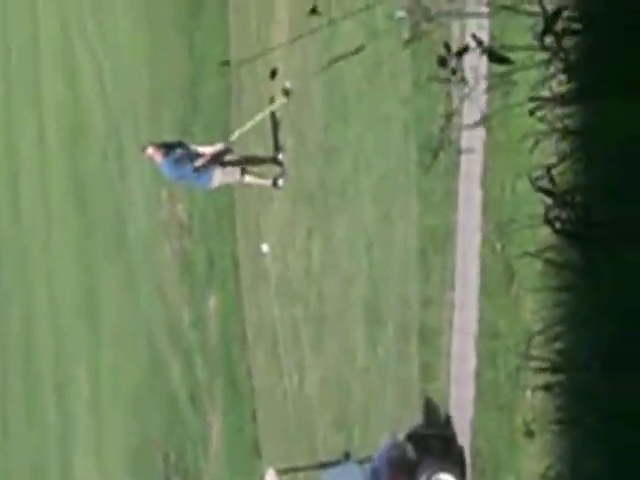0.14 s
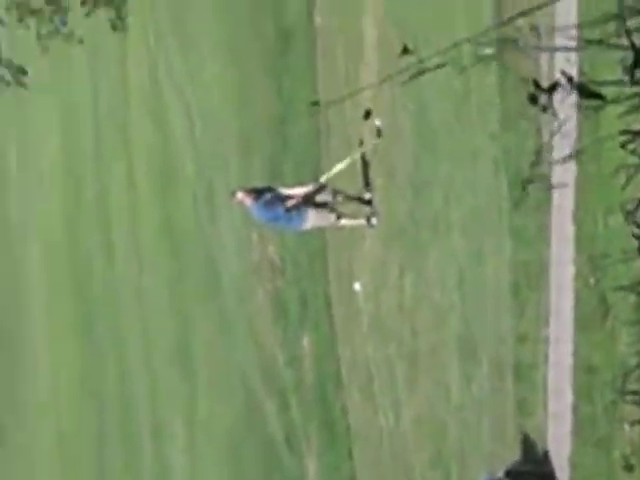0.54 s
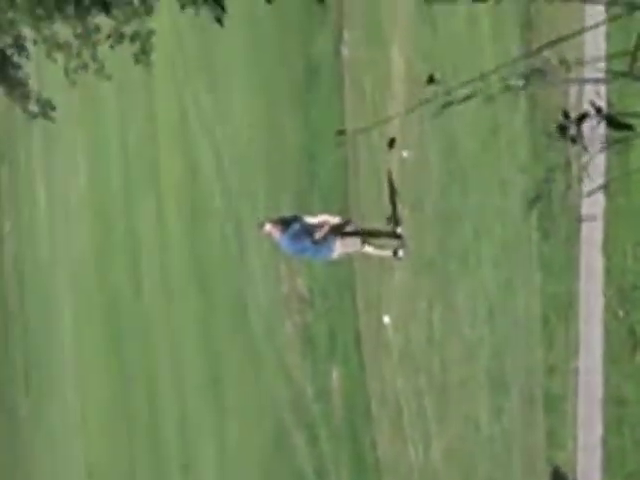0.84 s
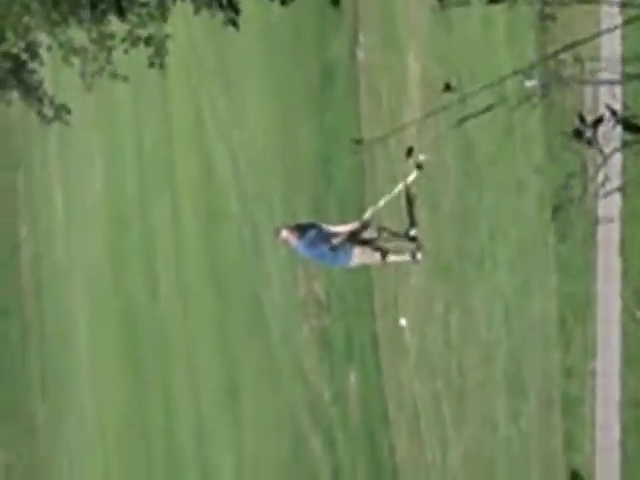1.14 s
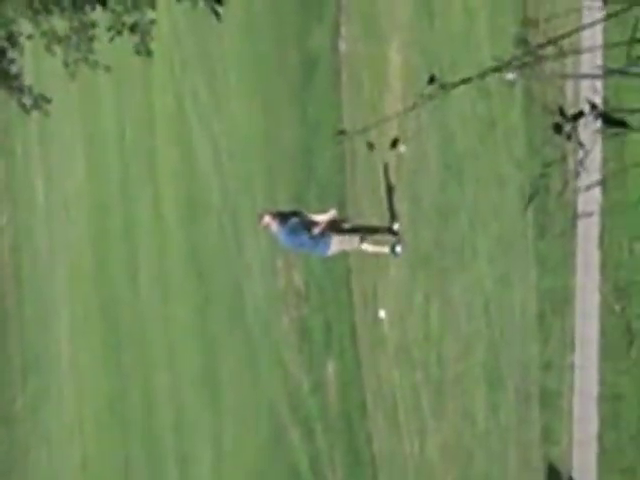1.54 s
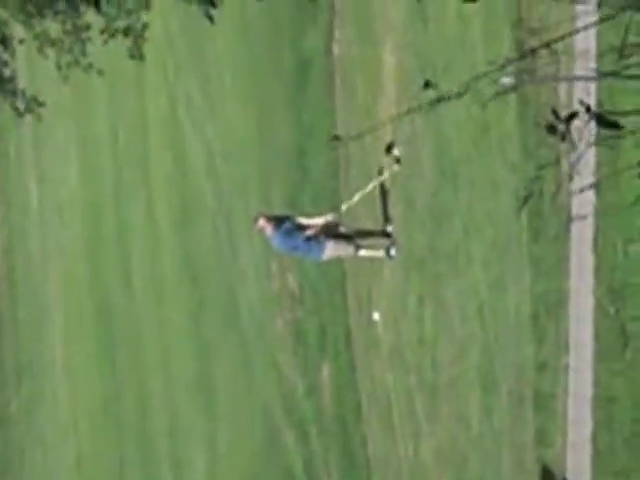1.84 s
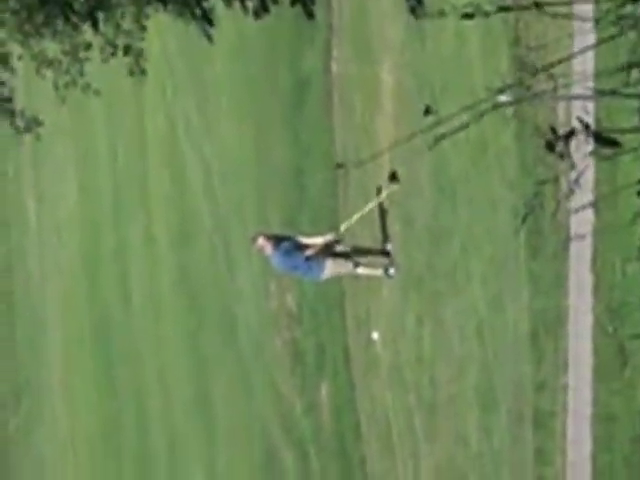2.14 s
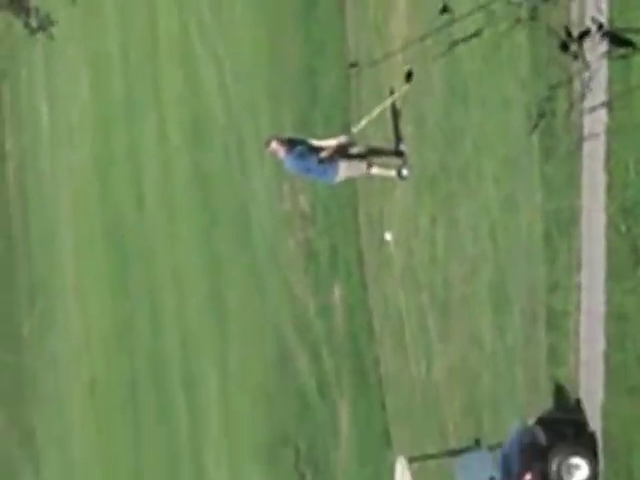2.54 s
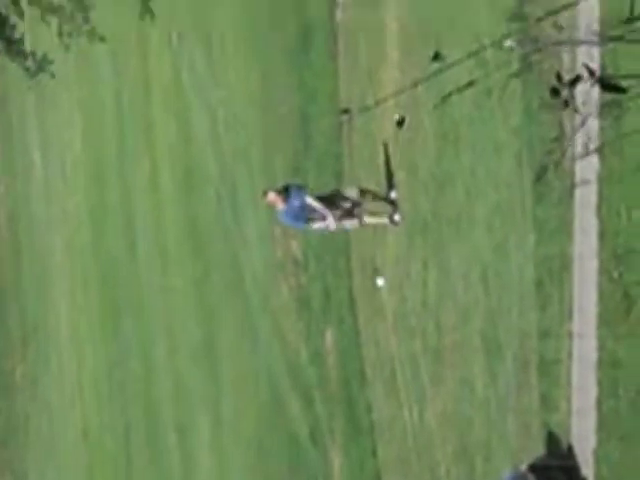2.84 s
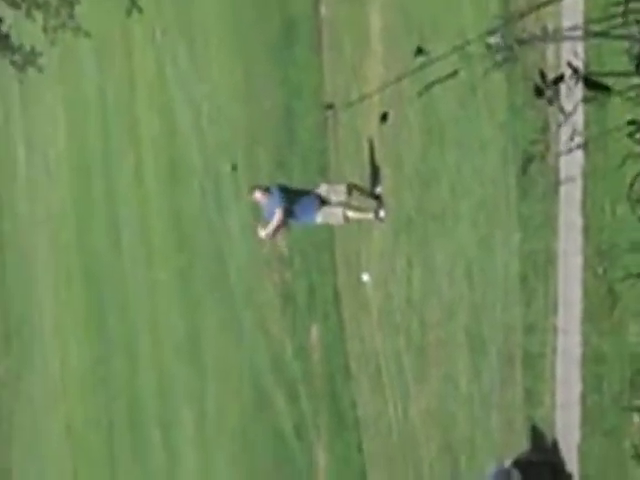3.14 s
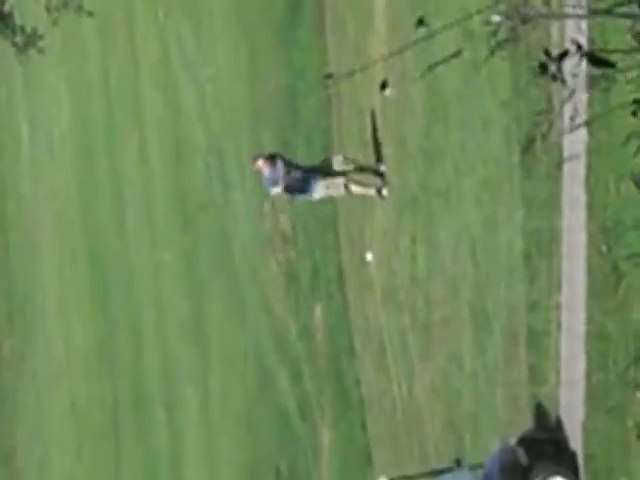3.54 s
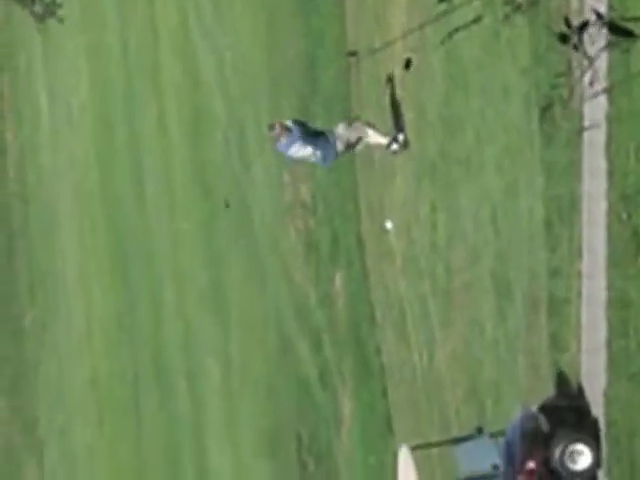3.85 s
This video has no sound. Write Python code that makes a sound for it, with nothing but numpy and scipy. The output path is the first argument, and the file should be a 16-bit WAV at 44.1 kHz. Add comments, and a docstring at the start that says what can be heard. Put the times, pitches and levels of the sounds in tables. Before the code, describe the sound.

One abrupt, brassy air horn honk with gas hiss ends a quiet outdoor stretch of whistling birds, low rumble and insects; it stops quickly, leaving a tree-line echo while the microphone's level ducks.

```python
"""Far traffic, low rumble, an idling engine, insects, hiss and a thin whine underlie the scene: shaped noise and sines.
Distant birds whistle and chirp over them: gliding sines with a diffuse return.
At 3.54 s a handheld air horn on open grass gives one short blast: a harmonic series and gas hiss.
Tree lines throw it back: delayed copies and a decaying noise tail.
A mono gain control ducks under the blast and recovers slowly."""
import sys
import numpy as np
from scipy import signal
from scipy.fft import rfft, irfft, next_fast_len
from scipy.io import wavfile
from scipy.ndimage import uniform_filter1d, minimum_filter1d, map_coordinates

SR = 44100
rng = np.random.default_rng(int(sys.argv[2]) if len(sys.argv) > 2 else 0)


def materialize(psi):
    """Save the field psi as 16-bit PCM at rate SR to the path in sys.argv[1].

    A 1-D psi becomes a single channel; in a 2-D psi each row is a channel.
    """
    bounded = np.clip(np.atleast_2d(psi).T, -1, 1)
    quanta = np.round(bounded * 32767).astype(np.int16)
    wavfile.write(sys.argv[1], SR, quanta)


def linear_from_db(decibels):
    """Turn decibels (scalar or array-like) into linear amplitude factors; 0 gives 1."""
    return 10 ** (np.asarray(decibels, float) / 20)


N = 176400
T = np.arange(N) / SR


def unit(x):
    """Normalization: scales the signal to rms 1."""
    return x / np.sqrt(np.mean(x ** 2) + 1e-20)


def along(points, hz):
    """Interpolates (f/Hz, value) points on a logarithmic frequency axis."""
    f, v = np.transpose(points)
    return np.interp(np.log(hz + 1), np.log(f + 1), v)


def curves(rows):
    """Linear interpolation in time: one value per sample for each column after t/s."""
    s, *columns = np.transpose(rows)
    return [np.interp(T, s, column) for column in columns]


def wobble(rate):
    """Band-limited random modulation: a smooth curve through `rate` normal deviates a second."""
    return map_coordinates(rng.standard_normal(N // 40), [T * rate])


def rise(s, width):
    """Smooth onset: a hyperbolic tangent from 0 to 1, centred on s."""
    return .5 + .5 * np.tanh((T - s) / width)


def coloured(x, spectrum):
    """Linear filtering: multiplies the spectrum of x by an (f/Hz, level/dB) curve."""
    m = next_fast_len(len(x) + 8192)
    gain = linear_from_db(along(spectrum, np.fft.rfftfreq(m, 1 / SR)))
    return irfft(rfft(x, m) * gain, m)[:len(x)]


def rush(spectrum, patchy_db):
    """Turbulence-like noise of rms 1, with random gain in patches of time and frequency."""
    z = signal.stft(rng.standard_normal(N), nperseg=512)[2]
    field = uniform_filter1d(rng.standard_normal(z.shape), size=5, axis=0)
    field = uniform_filter1d(field, size=10, axis=1)
    noise = signal.istft(z * linear_from_db(patchy_db * unit(field)), nperseg=512)[1][:N]
    return unit(coloured(noise, spectrum))


def scattered(x, t60s):
    """Diffuse reverberation: convolution with noise of unit energy, each frequency dying at its own t60."""
    hz, t, z = signal.stft(rng.standard_normal(SR), SR, nperseg=256)
    decay = linear_from_db(-60 * t / along(t60s, hz)[:, None])
    tail = signal.istft(z * decay, SR, nperseg=256)[1]
    return signal.fftconvolve(x, tail / np.linalg.norm(tail))[:N]


def ringing(spectrum):
    """Minimum phase: the phase/rad of the causal filter with this curve, by the folded cepstrum."""
    hz = np.fft.rfftfreq(4096, 1 / SR)
    cepstrum = irfft(np.log(linear_from_db(along(spectrum, hz))))
    cepstrum[1:2048] *= 2
    cepstrum[2049:] = 0
    return hz, rfft(cepstrum).imag


# level of the far road before trim and flutter: t/s, level/dB
ROAD_LEVEL = [(0.0, -51.5), (0.25, -49), (0.45, -49.5), (0.49, -47.5), (1.3, -46.5), (1.52, -47.5),
              (1.53, -46.5), (1.72, -45), (2.35, -43.5), (3.5, -46.5)]
# relative spectrum of the far road: f/Hz, level/dB (per Hz)
ROAD_COLOUR = [(290, -62), (500, -12), (637, -14), (781, 3), (897, -1), (994, 0.5), (1130, -4),
               (1330, -5.5), (1510, -2.5), (1750, -5), (1990, -13), (2840, -15.5), (4600, -24.5),
               (5980, -40), (10100, -120)]


def far_road():
    """Many incoherent distant sources sum to noise, here of slowly varying level."""
    trim_db = -0.55
    level_db = curves(ROAD_LEVEL)[0] + trim_db + 0.21 * wobble(22.03)
    return linear_from_db(level_db) * rush(ROAD_COLOUR, patchy_db=1.57)


# level of the rumble before trim and flutter: t/s, level/dB
RUMBLE_LEVEL = [(0.0, -57.5), (0.2, -58.5), (1.72, -57.5), (2.16, -59.5), (2.84, -55), (2.85, -56.5),
                (3.5, -55)]
# relative spectrum of the rumble: f/Hz, level/dB (per Hz)
RUMBLE_COLOUR = [(12, -48), (20, -3), (59, -5), (92, -1.5), (155, -4), (228, -5), (278, -10), (478, -8.5),
                 (600, -13), (780, -13.5), (1320, -120)]


def low_rumble():
    """Low-pass noise: energy concentrated at the lowest frequencies."""
    trim_db = 3.5
    level_db = curves(RUMBLE_LEVEL)[0] + trim_db + 0.29 * wobble(3.76)
    return linear_from_db(level_db) * rush(RUMBLE_COLOUR, patchy_db=1.7)


# tone of the idling engine before its random wander: t/s, f/Hz, level/dB
ENGINE = [(0, 111.3, -56.5), (.45, 103.6, -65), (.7, 95, -80), (2.2, 87.7, -64), (2.5, 88.3, -56),
          (3.3, 87, -58), (4, 89.4, -60.5)]


def idling_engine():
    """Frequency and amplitude modulation: one low sine whose pitch and level wander."""
    hz, db = curves(ENGINE)
    level_db = db + 3.8 * wobble(7.86)
    phase = 2 * np.pi * np.cumsum(hz + 3 * wobble(9)) / SR
    return linear_from_db(level_db) * np.sin(phase)


# relative spectrum of the insects: f/Hz, level/dB
INSECTS = [(2650, -24), (4500, -8.5), (4830, -5.5), (5210, 4), (5500, 5), (5750, 2), (6500, -21),
           (8450, -48), (14300, -120)]


def insect_band():
    """Superposition of many callers, heard as one narrow band of noise."""
    return linear_from_db(-57) * rush(INSECTS, patchy_db=.4)


# relative spectrum of the treble hiss: f/Hz, level/dB
HISS = [(3710, -20), (6300, -3), (7560, -5), (15100, -5.5), (15700, -12)]


def treble_hiss():
    """Stationary high-frequency noise, a faint floor."""
    return linear_from_db(-63) * rush(HISS, patchy_db=0.3)


def thin_whine():
    """Frequency modulation: a faint sine of constant level, wavering slightly about 14550 Hz."""
    hz = 14550 + 25 * wobble(60)
    return linear_from_db(-81) * np.sin(2 * np.pi * np.cumsum(hz) / SR)


def background():
    """Superposition: the pressures of all the background sources add."""
    return far_road() + idling_engine() + low_rumble() + insect_band() + thin_whine() + treble_hiss()


# whistled notes before warble: start t/s, length t/s, start f/Hz, end f/Hz, level/dB
NOTES = [(0.013, 0.014, 2960, 3240, -55), (.03, .04, 2830, 2820, -53), (.075, .035, 2860, 2450, -56),
         (.178, .022, 2450, 2600, -59), (.195, .135, 2900, 2980, -52), (.65, .06, 2830, 2800, -60),
         (.705, .018, 3750, 3450, -60), (.74, .04, 3000, 3020, -56), (.775, .05, 3020, 2400, -52),
         (.905, .165, 2880, 3030, -53), (.885, .025, 2450, 2750, -60), (1.1, .06, 3000, 2990, -59),
         (1.184, 0.046, 3000, 3040, -62), (1.27, .07, 3000, 3010, -50.5), (1.265, .17, 3740, 3740, -58.5),
         (1.255, 0.032, 3800, 3510, -56), (1.36, .07, 2870, 2850, -52), (1.31, .04, 2290, 2270, -57),
         (1.56, .06, 2960, 2930, -53), (1.7, .02, 2930, 2920, -55), (1.724, .045, 3250, 2720, -42),
         (1.75, .06, 3060, 2980, -47), (1.789, .05, 2230, 2600, -45), (1.82, .06, 3080, 2650, -46),
         (1.852, .055, 2570, 2300, -43), (1.89, .045, 2480, 2240, -48), (1.92, .07, 2120, 2100, -55),
         (2.21, .09, 2970, 2880, -48), (2.31, .085, 2860, 2790, -49), (2.278, .045, 2280, 2270, -48),
         (2.52, .035, 2830, 2760, -54), (2.41, .07, 2800, 2840, -56), (2.21, .13, 3620, 3750, -59),
         (2.635, 0.075, 2268, 2320, -45), (2.698, 0.036, 2318, 2497, -41.5), (2.75, .04, 2640, 2650, -44.5),
         (2.77, .035, 2850, 2980, -51), (2.873, 0.092, 2350, 2310, -55), (3.398, 0.19, 2860, 2970, -60),
         (3.27, .11, 7120, 7020, -65)]
# chirps that sweep up and fall back, before rasp and warble: start t/s, length t/s, foot f/Hz, top f/Hz, level/dB
CHIRPS = [(.388, .04, 3100, 4500, -55), (1.117, 0.034, 4000, 4800, -62), (1.15, .04, 4100, 4800, -60),
          (1.244, 0.03, 3450, 4570, -57), (2.2, 0.041, 3400, 4600, -52.5), (2.622, .03, 3050, 3800, -60),
          (3.068, .035, 3470, 4200, -56), (3.089, .05, 3300, 4350, -51.5), (3.187, .035, 3600, 4440, -53),
          (3.275, .04, 3700, 4450, -54), (3.3, .06, 3700, 4460, -52.5), (3.085, .05, 6800, 8600, -66),
          (3.182, .068, 8100, 9300, -67), (3.39, .1, 8000, 9200, -67)]
# decay of the birds' echoes: f/Hz, t60/s
GROVE = [(2000, .42), (8000, .4)]
GROVE_DB = 1  # level of the birds' echoes
WARBLE_HZ, WARBLE_DB, WARBLES_PER_S = 30, 3, 130
RASP_HZ, RASPS_PER_S = 200, 600  # fast pitch scatter that makes the chirps breathy


def birds():
    """Gliding sines: warbling whistles and breathy chirps, half lost in their own diffuse return."""
    song = np.zeros(N)
    warble_hz = WARBLE_HZ * wobble(WARBLES_PER_S)
    warble_db = WARBLE_DB * wobble(WARBLES_PER_S)
    rasp_hz = RASP_HZ * wobble(RASPS_PER_S)
    calls = [(*row, False) for row in NOTES] + [(*row, True) for row in CHIRPS]
    for s, length, hz, to_hz, db, arched in calls:
        at, u = round(s * SR), np.linspace(0, 1, round(length * SR))
        span = slice(at, at + len(u))
        path = 1 - np.abs(2 * u - 1) ** 1.1 if arched else u
        scatter = rasp_hz if arched else warble_hz
        glide = hz + (to_hz - hz) * path + scatter[span]
        swell = np.abs(np.sin(np.pi * u)) ** 0.38
        song[span] += linear_from_db(db) * swell * np.sin(2 * np.pi * np.cumsum(glide) / SR)
    song = song * linear_from_db(warble_db)
    return song + linear_from_db(GROVE_DB) * scattered(song, GROVE)


START_S, ATTACK_S = 3.5385, .0036

# relative spectrum of the gas hiss: f/Hz, level/dB (per Hz)
GAS = [(150, -3.5), (500, -15.5), (1000, -2), (2000, 0), (4500, 1.5), (9000, -20), (15500, -1)]
GAS_DB, GAS_BURST_DB, GAS_BURST_S = -24, 14.5, 0.054  # before the horn's level; burst decays to 1/e in dB


def gas_hiss():
    """Jet noise: escaping gas, strongest in the opening burst and then settling."""
    since = np.maximum(T - START_S, 0)
    level_db = GAS_DB + GAS_BURST_DB * np.exp(-since / GAS_BURST_S)
    return linear_from_db(level_db) * rise(START_S + 2 * ATTACK_S, ATTACK_S) * rush(GAS, patchy_db=3.0)


# pitch of the diaphragm before jitter, which starts high and sinks onto the pipe: t/s, f/Hz
PITCH = [(3.54, 880), (3.545, 846), (3.55, 755), (3.556, 684), (3.563, 638), (3.572, 610), (3.582, 598),
         (3.593, 593), (3.599, 612), (3.604, 592), (3.64, 583), (3.7, 578.8), (3.75, 580)]
# colour of the sound straight from the bell, before the horn's level: f/Hz, level/dB
BELL = [(580, -8), (602, -14.5), (655, -27), (750, -15), (850, -3.5), (1160, 0), (1250, -2), (1420, -9),
        (1600, -5.5), (1740, 1.5), (1900, -9), (2200, -0.5), (2320, -7), (2900, -18), (3500, -12),
        (4100, -13.5), (4650, -17.5), (5200, -27), (5800, -22), (6400, -24.5), (7000, -24.5), (7600, -31),
        (10500, -26), (15500, -31)]
JITTER_HZ, START_JITTER_HZ, STEADIES_S = .5, 4, .03
FLUTTER_DB = .14  # for the fundamental, growing with harmonic number
BLOOM_S = .003  # lag of the second harmonic's start; the rest start up to 2.6 times this late
FLARE_LAG = 3.5  # radians: the flare delays each partial by this over its angular frequency


def diaphragm_buzz():
    """Harmonic series: a periodic diaphragm drives the bell, which filters each partial and disperses it."""
    since = np.maximum(T - START_S, 0)
    jitter = JITTER_HZ * wobble(90)
    start_jitter = START_JITTER_HZ * np.exp(-since / STEADIES_S) * wobble(700)
    hz = curves(PITCH)[0] + jitter + start_jitter
    turn = 2 * np.pi * np.cumsum(hz) / SR
    bell_phase = ringing([(150, -37)] + BELL)
    buzz = np.zeros(N)
    for k in range(1, 28):
        level_db = along(BELL, k * hz) + FLUTTER_DB * k ** 1.19 * wobble(60)
        phase = k * turn + np.interp(k * hz, *bell_phase) - FLARE_LAG * np.log(k)
        onset = rise(START_S + ATTACK_S + BLOOM_S * min(k - 1, 2.6), ATTACK_S / 2)
        buzz += linear_from_db(level_db) * np.cos(phase) * onset
    return buzz


# single echoes: delay t/s, level/dB
ECHOES = [(.057, -15), (.08, -22), (.33, -24.5), (.38, -34.5)]
# loss on the way to the trees: f/Hz, level/dB (per s of delay)
AIR = [(500, -1), (4000, -38), (9000, -71), (15500, -79)]


def single_echoes(far):
    """Discrete reflection: delayed copies, duller with distance as air absorbs the treble."""
    echoes = np.zeros(N)
    for s, db in ECHOES:
        dulled = coloured(far, [(f, s * loss) for f, loss in AIR])
        echoes += linear_from_db(db) * np.pad(dulled, (round(s * SR), 0))[:N]
    return echoes


# decay of the scattered return: f/Hz, t60/s
TREES = [(500, 0.45), (2000, 1.67), (6000, 0.88), (9000, 0.63), (14000, 0.42)]


def trees_return(far):
    """Diffuse scattering: the trees return a dense decaying tail."""
    return linear_from_db(-13.5) * scattered(far, TREES)


# colour of the returned sound against the bell: f/Hz, level/dB
RETURN = [(580, 7), (850, 0), (1200, -3), (1800, -6.5), (2900, 2.5), (3500, -2), (4600, 7), (5800, 13),
          (7000, 16.5), (11000, 11.5), (15500, 9)]
STOP_S, RELEASE_S, HORN_DB = 3.731, 0.02, -2
GAS_RETURN_DB = -10  # the hiss carries less far than the tone


def horn():
    """Direct and reflected sound: buzz and hiss from the bell, then single echoes and the trees' return."""
    shut = 1 - rise(STOP_S + RELEASE_S / 2, RELEASE_S / 2)
    buzz, gas = diaphragm_buzz(), gas_hiss()
    blast = linear_from_db(HORN_DB) * shut * (buzz + gas)
    far = coloured(linear_from_db(HORN_DB) * shut * (buzz + linear_from_db(GAS_RETURN_DB) * gas), RETURN)
    return blast + single_echoes(far) + trees_return(far)


def scene():
    """Superposition at one point: everything reaches one microphone, giving two equal channels."""
    return np.tile(horn() + birds() + background(), (2, 1))


def band_limit(x):
    """A steep low-pass at the top of the band."""
    return signal.sosfilt(signal.butter(12, 15810, fs=SR, output="sos"), x)


# overall band limit of the sound, a gentle bass loss and a steep cut above 15.7 kHz: f/Hz, level/dB
BAND_LIMIT = [(20, -3), (60, 0), (15700, 0), (16000, -70)]
LIMIT_DB, GRAB_S = -12, 0.00042  # threshold of mean power, time constant of the gain
HOLD_S, LET_GO_DB_PER_S = .1, 28


def record(dry):
    """Dynamic range limiting: turns down quickly what exceeds the limit, holds, and lets go slowly."""
    # mean power of the latest 150 samples
    power = np.abs(uniform_filter1d(dry[0] ** 2, size=150, origin=74))
    level_db = 10 * np.log10(power + 1e-12)
    hold = round(HOLD_S * SR)
    # the deepest cut needed within the hold time just past
    need_db = minimum_filter1d(np.minimum(LIMIT_DB - level_db, 0), size=hold, origin=(hold - 1) // 2)
    # recovery no faster than the let-go slope
    recovery_db = LET_GO_DB_PER_S * T
    rising_db = np.minimum.accumulate(need_db - recovery_db) + recovery_db
    pull = 1 / (GRAB_S * SR)
    gain_db = signal.lfilter([pull], [1, pull - 1], rising_db)
    mono = coloured(dry[0] * linear_from_db(gain_db), BAND_LIMIT)
    return band_limit(np.tile(mono, (2, 1)))


dry = scene()
out = record(dry)
materialize(out)
```